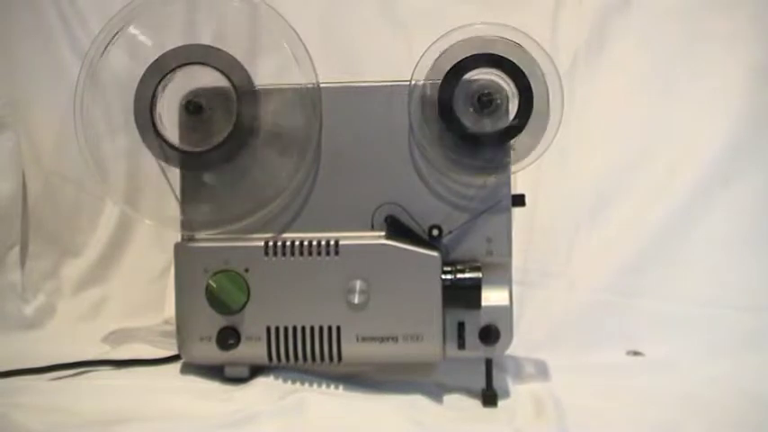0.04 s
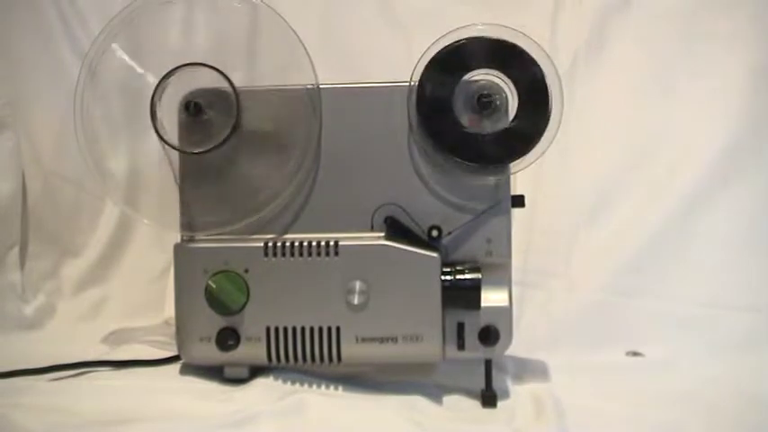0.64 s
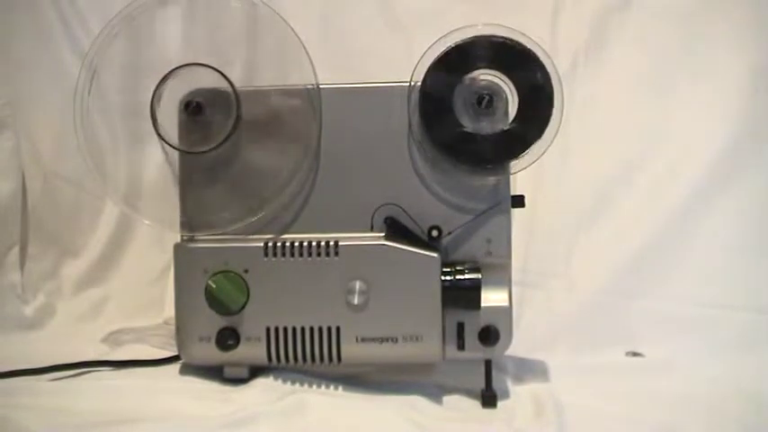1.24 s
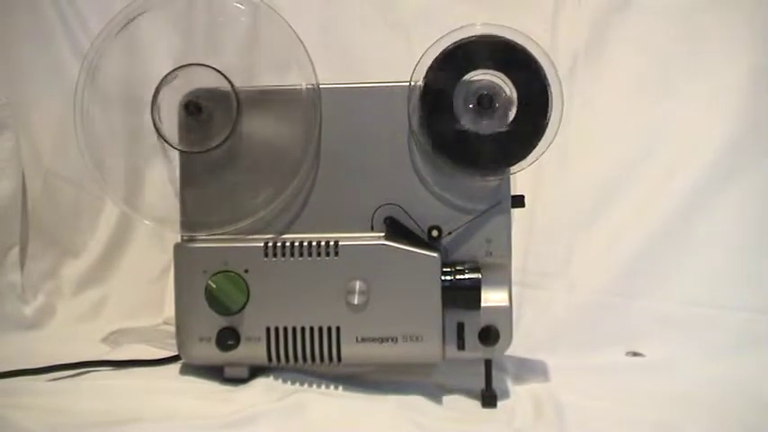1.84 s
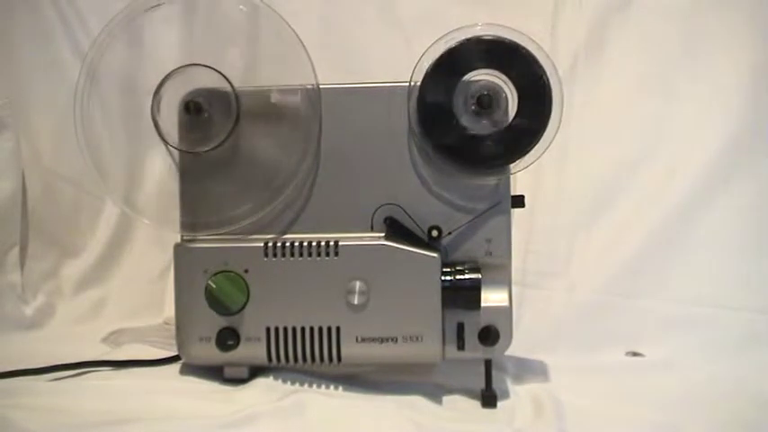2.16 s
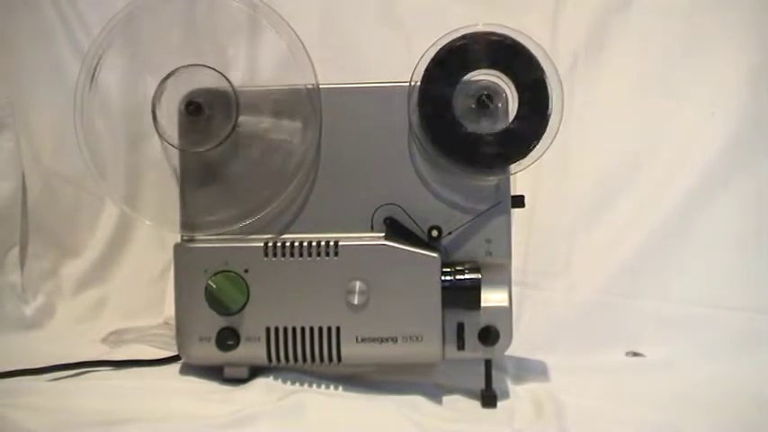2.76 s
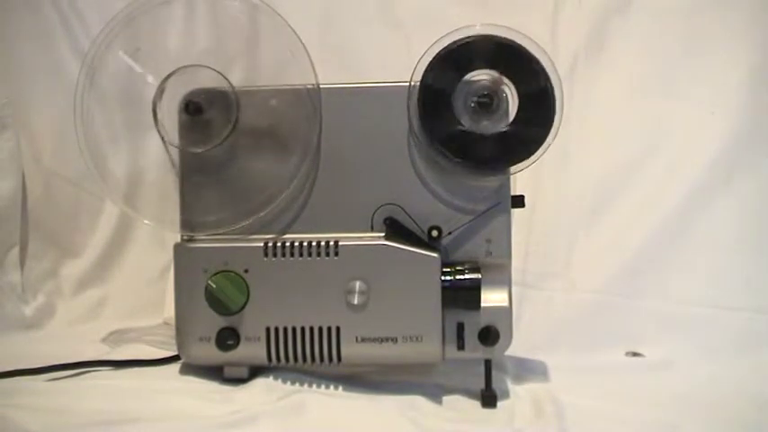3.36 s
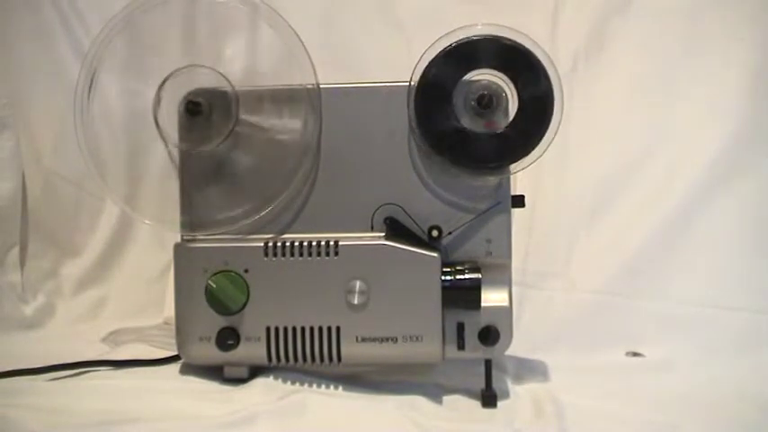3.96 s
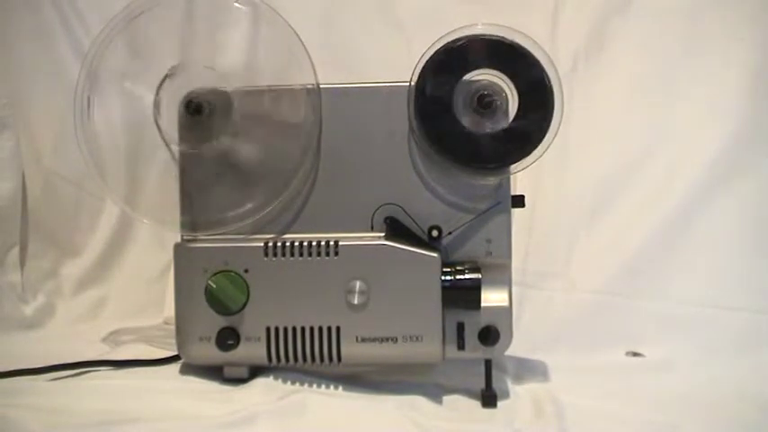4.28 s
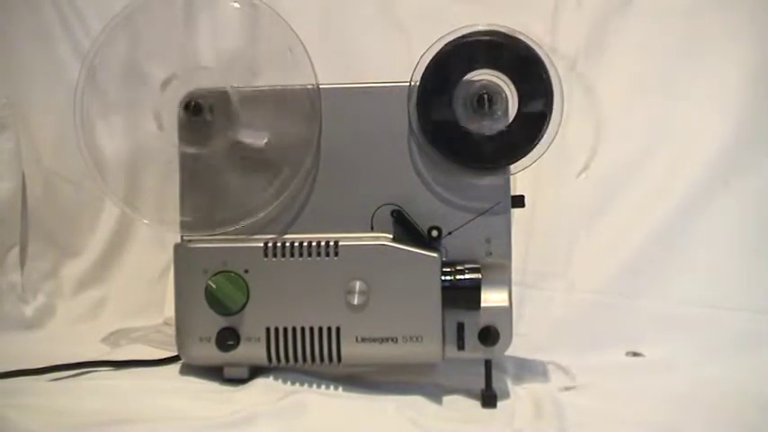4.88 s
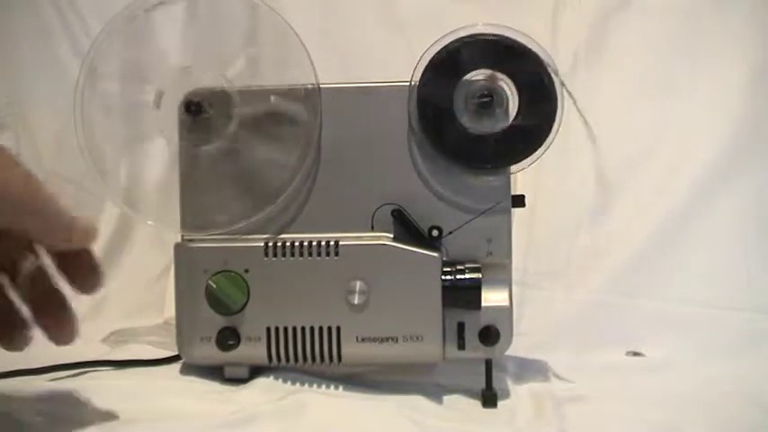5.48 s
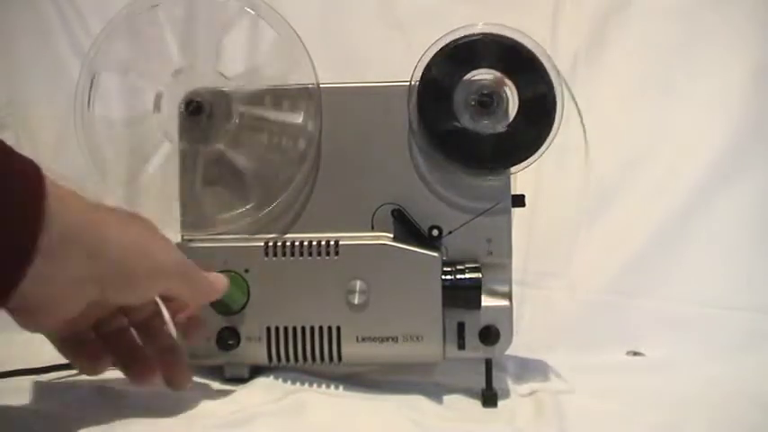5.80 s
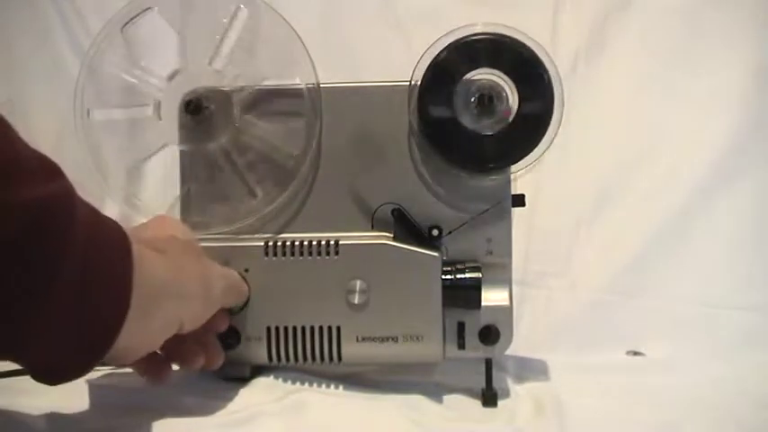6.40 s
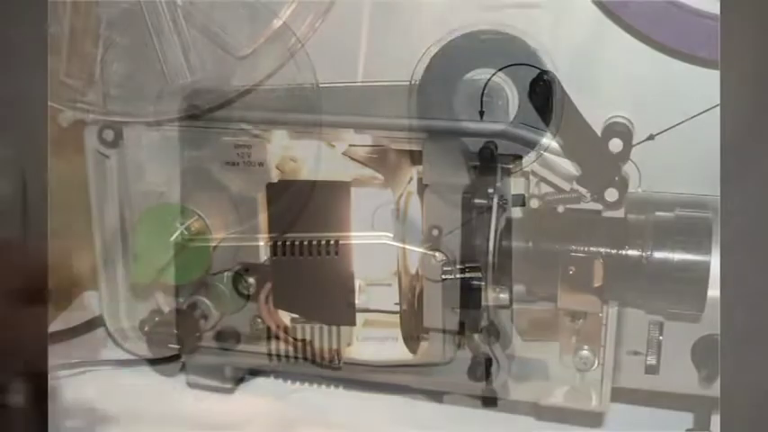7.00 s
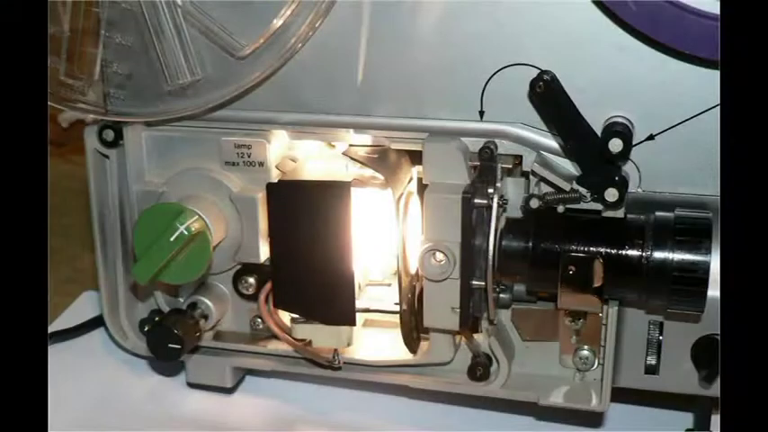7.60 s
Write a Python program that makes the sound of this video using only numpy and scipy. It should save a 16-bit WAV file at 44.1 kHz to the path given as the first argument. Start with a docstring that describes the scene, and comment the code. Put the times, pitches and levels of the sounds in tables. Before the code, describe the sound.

Reels chatter and squeak over a humming projector motor until the film runs out, its tail flicks, and a knob snaps off.

```python
"""A film projector rewinding

A small projector's motor hums and its belts and fan whir. The warped reel rubs and squeaks at the
same places on every turn, the shaking reels chatter and chirp, and the film scrapes the reel's rim.
The film runs out, its loose tail flicks the housing, and a knob switches the motor off with a crack.
Faint ticks sound as the projector runs down, and the last moment fades to silence."""
import sys
import numpy as np
from scipy import signal
from scipy.fft import rfft, irfft
from scipy.io import wavfile

SR = 44100
rng = np.random.default_rng(int(sys.argv[2]) if len(sys.argv) > 2 else 0)


def transcribe(u):
    """Save the signal u as a 16-bit wav file named by the first command-line argument.

    u: samples, shape (n,) or (channels, n), limited to [-1, 1]; the rate is SR.
    q: integer samples, one column per channel.
    """
    v = np.clip(np.atleast_2d(u).T, -1, 1)
    q = np.round(v * 32767).astype(np.int16)
    wavfile.write(sys.argv[1], SR, q)


N = 336924
T = np.arange(N) / SR
HZ = np.fft.rfftfreq(8192, 1 / SR)  # the pitches at which filters are drawn
FILM_OUT_S, MOTOR_OFF_S = 4.6, 6.717


def amp(db):
    """Turns decibels into a number to multiply by."""
    return 10 ** (np.asarray(db) / 20)


def unit(x):
    """Scales a signal to an average strength (rms) of one."""
    return x / np.sqrt(np.mean(x ** 2) + 1e-20)


def curve(rows):
    """Joins rows of (time_s, value) with straight lines."""
    return np.interp(T, *np.transpose(rows))


def at_pitches(rows, hz):
    """Looks up values between rows of (pitch_hz, value), with pitch spaced in octaves."""
    row_hz, value = np.transpose(rows)
    return np.interp(np.log(hz + 1), np.log(row_hz + 1), value)


def add(mix, start_s, sound):
    """Adds a sound into the mix at the given time."""
    part = mix[:, max(round(start_s * SR), 0):][:, :sound.shape[1]]
    part += sound[:, :part.shape[1]]


def wander(hz, size=16384):
    """A random wobble of strength one, no faster than about hz."""
    return unit(np.interp(T * 2 * hz, np.arange(size), rng.standard_normal(size)))


def colour(rows, peaks=()):
    """A tone colour: a broad curve of decibels over pitch, with ringing peaks on top."""
    bumps = sum(db / (1 + (2 * (HZ - hz) / width) ** 2) for hz, width, db in peaks)
    return at_pitches(rows, HZ) + bumps


def filtered(x, shape_db):
    """Turns each pitch up or down, ringing only after a sound and never before it."""
    cepstrum = irfft(np.log(amp(shape_db)))
    forward_only = np.r_[1, np.full(len(HZ) - 2, 2), 1, np.zeros(len(HZ) - 2)]
    response = irfft(np.exp(rfft(cepstrum * forward_only)))
    return signal.oaconvolve(x, response[None], axes=1)[:, :x.shape[1]]


def tint(x, shape_db, band_hz=(0, SR)):
    """Colours a sound, scaled so that plain hiss comes out at its full strength within the band."""
    inside = (HZ >= band_hz[0]) & (HZ < band_hz[1])
    return filtered(x, shape_db) / np.sqrt(np.mean(amp(shape_db) ** 2 * inside))


def echoes(decay_s, size=12000):
    """A cloud of echoes for each side; here and below, a sound drops 60 dB in decay_s."""
    cloud = rng.standard_normal((2, size)) * amp(-60 * np.arange(size) / SR / decay_s)
    return cloud / np.sqrt(np.sum(cloud ** 2, axis=1, keepdims=True))


# How alike left and right are (1 is the same, 0 is unrelated): pitch_hz, likeness
EAR_LIKENESS = [(100, 0.6), (300, 0.94), (600, 0.56), (1200, 0.93), (2500, 0.76), (4500, 0.69),
                (6500, 0.52), (8500, 0.04), (12000, -0.08)]
def stereo(pair):
    """Blends two unrelated signals into left and right: alike in the bass, less so in the treble."""
    same = np.clip(at_pitches(EAR_LIKENESS, HZ), -.99, .99)
    side = filtered(pair[1:], 10 * np.log10((1 - same) / (1 + same)))
    return np.vstack([pair[:1] + side, pair[:1] - side])


def friction(grain_db, grain_hz):
    """Hiss made grainy by countless small catches."""
    return stereo(rng.standard_normal((2, N)) * unit(amp(grain_db * wander(grain_hz))))


# Hum of the mains power: pitch_hz, level_db
HUM_TONES = [(100, -69.5), (200, -64.5), (300, -75)]
# Tones of the spinning shaft at a speed of one: pitch_hz, level_db
SHAFT_TONES = [(47, -82), (167.2, -76), (186, -70.5), (353, -61), (404, -73.5), (652, -72.5), (879, -76.5),
               (2244, -68.5)]
# How loud the motor is: time_s, gain_db
MOTOR_LOUDNESS = [(0, -1.5), (.6, 1.5), (2, 1.5), (3.3, 0), (4.5, -3.5), (5, -5.5), (5.5, -8), (6, -13),
                  (6.8, -14.5)]
# How fast the shaft spins: time_s, speed_ratio
SHAFT_SPEED = [(0, 1.003), (1, 1.005), (3, .999), (4.4, 1.008), (5, 1.015), (6.8, 1.014)]
def motor(waver=.002, throb_db=2.5, unloaded_db=-6.0, die_db_per_s=120):
    """Mains hum, plus shaft tones that soften and rise as the load goes; both die at switch-off."""
    hum = sum(amp(db) * np.sin(2 * np.pi * (hz * T + rng.random())) for hz, db in HUM_TONES)
    shaft_time = np.cumsum(curve(SHAFT_SPEED) * (1 + waver * wander(9.4))) / SR
    shaft = sum(amp(db + throb_db * wander(12)) * np.sin(2 * np.pi * (hz * shaft_time + rng.random()))
                for hz, db in SHAFT_TONES)
    load = amp(unloaded_db * np.clip((T - FILM_OUT_S) / 1.4 + .25, 0, 1))
    level = amp(curve(MOTOR_LOUDNESS) - die_db_per_s * np.maximum(T - MOTOR_OFF_S, 0))
    return np.sqrt(2) * level * (hum + shaft * load)


# How loud the belts, gears and fan are: time_s, level_db
WHIR_LOUDNESS = [(0.0, -55), (0.34, -56), (0.38, -52.5), (0.71, -52), (2.61, -53.5), (3.85, -55.5),
                 (3.93, -56.5), (4.1, -54.5), (4.68, -58), (4.7, -61), (5.0, -61), (6.07, -70.5),
                 (6.69, -71), (6.75, -69.5)]
# Their tone colour: pitch_hz, gain_db
WHIR_COLOUR = [(28, -43), (50, -14), (75, -14), (140, -4.5), (240, -8.5), (400, 0.5), (700, -2.5),
               (950, 1.5), (1550, 0), (1850, -9.5), (3000, -13.5), (6500, -21), (9000, -37.5),
               (15000, -39.5)]
# Pitches that the housing boosts or swallows: pitch_hz, width_hz, gain_db
HOUSING_PEAKS = [(308, 20, 2), (411, 27, 3), (460, 12, 5), (549, 4.7, 6), (872, 23, 3.5), (1123, 5.3, 8.5),
                 (1347, 86, -7), (1643, 18, 5.5), (2213, 32, 10), (2400, 91, 1)]
def whir(gain_db=-0.32, drone_db=12.5, die_db_per_s=53):
    """Belts, gears and fan stir the housing; as they coast to a stop, mostly its low drone remains."""
    rub = tint(friction(grain_db=2.7, grain_hz=400), colour(WHIR_COLOUR, HOUSING_PEAKS), (420, 1600))
    drone = signal.sosfiltfilt(signal.butter(2, [270, 340], "band", fs=SR, output="sos"), rub)
    since_off_s = np.maximum(T - MOTOR_OFF_S, 0)
    coasting = np.minimum(since_off_s / 0.23, 1)
    level = amp(curve(WHIR_LOUDNESS) + gain_db - die_db_per_s * since_off_s)
    return level * (rub + amp(drone_db) * coasting * drone)


def shudder(db, length_s, attack_s=0.001):
    """The power of one short shake: it starts sharply, holds and stops."""
    t = np.arange(SR // 5) / SR
    return (amp(db) * np.minimum(t / attack_s, 1) * np.exp(-(t / length_s) ** 4))[None] ** 2


def bump(middle_s, width_s):
    """A smooth rise to one and back to zero."""
    return np.exp(-((T - middle_s) / width_s) ** 2)


def on_turns(place):
    """The times when the reel passes a place, given as a share of one turn."""
    starts = np.array(REEL_TURNS)[:, 0]
    return starts + place * np.gradient(starts)


# Turns of the slowly quickening reel: start_s, rub_start_db, rub_end_db, lull_db, squeak_db
REEL_TURNS = [(.119, -9.5, -2.5, 0.5, -80), (0.371, 0.5, 2.5, -19.5, -62), (0.618, -1, 4, -7, -51),
              (0.868, 1.5, 2.5, -1, -53.5), (1.126, -1, 3, -7.5, -49.5), (1.384, 1.5, 1.5, -3, -52.5),
              (1.635, -1.5, 2, -14.5, -62), (1.886, 2, 2.5, -16.5, -53.5), (2.134, -1.5, 2, -7, -48),
              (2.383, 0, 3.5, 2, -54), (2.624, 3, -2.5, -5.5, -56), (2.873, 1, -2, -1.5, -52.5),
              (3.108, 1, -2, -5.5, -54), (3.355, -1, -6.5, -4.5, -54), (3.59, -0.5, -2.5, -8.5, -56),
              (3.83, -2, -2.5, -4, -63), (4.065, -3, -0.5, -1, -63), (4.3, -0.5, 2.5, -11, -66),
              (4.538, -6, -16, -5, -79)]
# Light rattle and sliding film, leaving a faint spindle rattle once the film is out: time_s, level_db
LIGHT_RATTLE = [(0, -58.5), (.06, -48), (.4, -50), (4.5, -45), (4.65, -51), (4.69, -64.5), (4.88, -65),
                (5.02, -69), (5.1, -91.5), (6.9, -97), (7.5, -104)]
# Where the warped reel rubs on every turn: share_of_turn, level_db, length_s
REEL_RUBS = [(.007, -37, 0.0098), (0.104, -41, 0.038), (0.25, -40, 0.029), (0.36, -44.5, 0.074),
             (0.434, -43, 0.096), (0.596, -43, 0.043), (0.763, -44.5, 0.058), (0.924, -42.5, 0.019)]
# Hard jolts of the reels on their spindles: start_s, level_db, length_s
REEL_JOLTS = [(0.077, -39, 0.025), (0.371, -34.5, 0.013), (0.414, -39.5, 0.043), (0.504, -36, 0.041),
              (0.624, -33.5, 0.011), (0.681, -37.5, 0.022), (0.772, -33, 0.041), (0.876, -38.5, 0.026),
              (0.939, -33, 0.01), (1.006, -33.5, 0.067), (1.132, -34.5, 0.027), (1.193, -31, 0.011),
              (1.403, -34, 0.014), (1.444, -31, 0.016), (1.532, -39.5, 0.032), (1.618, -34, 0.013),
              (1.656, -31, 0.016), (1.693, -37, 0.035), (1.749, -39.5, 0.026), (1.781, -40, 0.024),
              (1.904, -32.5, 0.017), (1.946, -36.5, 0.02), (2.03, -36.5, 0.03), (2.135, -37, 0.027),
              (2.224, -35.5, 0.0093), (2.266, -43, 0.033), (2.385, -33.5, 0.026), (2.436, -39.5, 0.033),
              (2.505, -35, 0.0062), (2.521, -43.5, 0.068), (2.633, -33.5, 0.0065), (2.681, -36.5, 0.03),
              (2.776, -36, 0.06), (2.881, -35.5, 0.02), (2.931, -37, 0.017), (2.971, -37.5, 0.036),
              (3.019, -35, 0.019), (3.117, -33, 0.029), (3.189, -33, 0.017), (3.229, -36.5, 0.03),
              (3.297, -37, 0.015), (3.358, -37.5, 0.01), (3.406, -38.5, 0.027), (3.504, -38, 0.027),
              (3.671, -39, 0.011), (3.831, -40.5, 0.028), (3.97, -37.5, 0.017), (4.055, -37, 0.017),
              (4.124, -36, 0.018), (4.207, -35, 0.052), (4.359, -35, 0.026), (4.447, -33, 0.016),
              (4.521, -41, 0.021), (4.608, -37.5, 0.037)]
def shaking(spread_db=1.4, jitter_s=0.002, lift_db=-5, lift_s=0.0044, jolt_db=-2, flutter_db=2.0):
    """How hard the reels shake: a light rattle, with rubs, lulls and jolts until the film is out."""
    power = amp(curve(LIGHT_RATTLE))[None] ** 2
    for place, rub_db, length_s in REEL_RUBS:
        chance = np.clip(rng.standard_normal((len(REEL_TURNS), 2)), -2, 2)
        for s, (_, start_db, end_db, _, _), (late, strong) in zip(on_turns(place), REEL_TURNS, chance):
            db = rub_db + start_db + (end_db - start_db) * place + spread_db * strong
            if s < FILM_OUT_S + .04:
                add(power, s + jitter_s * late, shudder(db, length_s))
    # The reel goes quiet as it swings free late in each turn, and as it lifts off before each jolt.
    lulls = sum(db * bump(s, width_s=0.013) for s, (*_, db, _) in zip(on_turns(0.92), REEL_TURNS))
    lifts = sum(lift_db * bump(s - lift_s / 2, lift_s) for s, _, _ in REEL_JOLTS)
    power *= amp(lulls + lifts) ** 2
    for s, db, length_s in REEL_JOLTS:
        add(power, s, shudder(db + jolt_db, length_s))
    return np.sqrt(power[0]) * unit(amp(flutter_db * wander(180)))


# Tone colour of the knocking reels: pitch_hz, gain_db
REEL_COLOUR = [(300, -35.5), (1800, -17), (3200, -9.5), (4150, -10), (4600, 0), (5500, 0), (6700, -3.5),
               (7600, -7.5), (8200, -7.5), (8600, -12.5), (9500, -15), (11400, -13), (13500, -29.5),
               (15500, -27)]
def chatter(force, gain_db=-5.0, knocks_per_s=400, spread_db=2.5, growth=0.82, contacts=6):
    """The reels bounce in countless tiny knocks; each point of contact rings a little differently."""
    strength = force * unit(force) ** (growth - 1)
    knocks = np.zeros((2, N))
    for _ in range(contacts):
        hits = rng.random(N) < knocks_per_s / SR
        sizes = amp(spread_db * np.clip(rng.standard_normal(N), -2, 2))
        kicks = strength * unit(hits * sizes)
        knocks += signal.oaconvolve(kicks[None], echoes(decay_s=0.015, size=1024), axes=1)[:, :N]
    return amp(gain_db) * tint(stereo(knocks / np.sqrt(contacts)), colour(REEL_COLOUR), (4200, 8500))


# Notes at which the plastic reels ring: pitch_hz, width_hz, gain_db
REEL_NOTES = [(4555, 260, -10), (5350, 320, -6.5), (5726, 200.5, -2.5), (5880, 90.2, -0.5), (6460, 140, -6),
              (6820, 250, -3), (7330, 110, -1)]
def chirps(force, gain_db=-2.5, hop_db=6, hop_hz=100, bend=.005, growth=1.095):
    """Hard shaking makes the plastic reels sing; as the contact moves, their notes take turns."""
    shares = np.array([amp(db + hop_db * wander(hop_hz)) for _, _, db in REEL_NOTES])
    shares /= np.linalg.norm(shares, axis=0) ** 0.75  # the notes compete for the same energy
    song = np.zeros((2, N))
    for (hz, width_hz, _), share in zip(REEL_NOTES, shares):
        # Every slip nudges the wave, which smears the note over its width.
        slips = rng.standard_normal((2, N)) * np.sqrt(2 * np.pi * width_hz / SR)
        phase = np.cumsum(2 * np.pi * hz * (1 + bend * wander(60)) / SR + slips, axis=1)
        song += share * np.cos(phase)
    song = signal.sosfilt(signal.butter(3, [4200, 8000], "band", fs=SR, output="sos"), song)
    return amp(gain_db) * force * unit(force) ** (growth - 1) * stereo(unit(song))


# How loud the scraping film is: time_s, level_db
SCRAPE_LOUDNESS = [(0, -59.5), (.3, -55.5), (.45, -51.5), (2.6, -52), (4.3, -54), (4.65, -59.5), (5.2, -77),
                   (6.8, -90), (7.2, -100)]
# Its tone colour: pitch_hz, gain_db
SCRAPE_COLOUR = [(1200, -27), (1750, -20), (2050, -7), (2250, -5), (2420, -3), (2560, -4), (2750, -3.5),
                 (3050, -12), (3500, -7.5), (4500, -9), (7000, -48.5)]
# Hollow ringing of the reel's rim: pitch_hz, width_hz, gain_db
RIM_PEAKS = [(2412, 80, 5.5), (2890, 40, 4)]
def scrape(force, growth=0.15, swell_db=1.7):
    """Film rubs the reel's rim, harder when the reel shakes, and dies away as the film runs out."""
    level = amp(curve(SCRAPE_LOUDNESS) + swell_db * wander(25)) * unit(force) ** growth
    rub = friction(grain_db=2.8, grain_hz=250)
    return level * tint(rub, colour(SCRAPE_COLOUR, RIM_PEAKS), (2150, 2950))


def squeaks(pitch_hz=1712, place=.33, width_s=0.019, waver=0.033, drift=0.027):
    """The reel gives a short, unsteady squeak at the same place on each turn."""
    level = sum(amp(db) * bump(s, width_s) for s, (*_, db) in zip(on_turns(place), REEL_TURNS))
    bend = 1 + waver * wander(120) + drift * wander(6.7)
    return np.sqrt(2) * level * np.sin(2 * np.pi * pitch_hz * np.cumsum(bend) / SR)


def strike(db, decay_s, snap_db=0):
    """A sharp hit: one snap, then a dying hiss that stands for many close notes."""
    t = np.arange(SR // 4) / SR
    hit = rng.standard_normal((2, len(t)))
    hit[0, 0] = amp(snap_db)
    return hit * amp(db - 60 * t / decay_s)


# Slaps of the film's tail, then faint ticks as the projector runs down:
# start_s, level_db, decay_s, brightness_db_per_octave, pitch_hz
SLAPS_AND_TICKS = [(5.030, -42.5, 0.013, 4.5, 2400), (5.2758, -44, 0.068, 4, 7240),
                   (5.5895, -46.5, 0.075, -2, 5000), (5.807, -65.5, 0.069, -6, 5300),
                   (5.924, -54.5, 0.044, 4, 4600), (5.9306, -55, 0.071, -9, 4830),
                   (5.9405, -58, .02, 0, 4830), (5.983, -60.5, 0.028, 3, 5240), (6.261, -66, 0.12, 4, 5660),
                   (6.425, -62.5, 0.018, 2, 5370), (6.598, -64, 0.1, -3, 7340),
                   (6.702, -73, 0.035, -3, 5860), (6.946, -73, 0.25, 1, 5460),
                   (7.076, -72.5, 0.014, -5, 5030), (7.29, -81, 0.1, -7, 5200)]
# Their tone colour: pitch_hz, gain_db
TAP_COLOUR = [(500, -48), (2000, -13.5), (3800, -5), (4600, 0.5), (6000, -4), (7400, -5), (8600, -13),
              (11500, -16.5), (13500, -32), (15500, -27)]
# Ringing that they all share: pitch_hz, width_hz, gain_db
TAP_PEAKS = [(4580, 130, 7.5), (4970, 81, 5.5), (5950, 120, 10.5), (6500, 90, 7), (7300, 100, 4)]
def slaps_and_ticks(brush_lead_s=0.0073, brush_db=-19, peak_width_hz=320, peak_db=8.5, stutter_db=1.0):
    """The film's tail brushes and slaps the housing, then faint ticks follow; each has its own pitch."""
    out = np.zeros((2, N))
    for s, db, decay_s, brightness, pitch_hz in SLAPS_AND_TICKS:
        peaks = TAP_PEAKS + [(pitch_hz, peak_width_hz, peak_db)]
        shape = colour(TAP_COLOUR, peaks) + brightness * np.log2(1 + (HZ / 2000) ** 2) / 2
        add(out, s - brush_lead_s, tint(strike(db + brush_db, decay_s), shape))
        add(out, s, tint(strike(db, decay_s, snap_db=8), shape))
    return stereo(out * unit(amp(stutter_db * wander(250))))


# The knob is gripped, turned and snaps over: start_s, ring_db, crack_db, centre_hz
KNOB_KNOCKS = [(6.03, -60.5, -74, 2390), (6.166, -67, -82, 2340), (6.802, -56, -67, 800),
               (6.8115, -46.5, -74, 810), (6.8167, -51.5, -49, 2650), (7.12, -80, -85, 1204),
               (7.375, -81.5, -98, 890)]
# Tone colour of its crack: pitch_hz, gain_db
CRACK_COLOUR = [(60, -37), (500, -14), (1000, -1), (1600, -5), (3200, 1), (4500, 2.5), (6500, -3),
                (8000, -16), (11000, -26), (15000, -36)]
# Notes of the knob and the panel behind it: pitch_hz, gain_db, decay_s
KNOB_NOTES = [(805, -8, .035), (933, 0.5, 0.035), (1045, -1, 0.033), (1500, 0, 0.077), (1590, -1, .08),
              (2090, -6, .05), (2580, -3.5, 0.04), (2920, -13, .04), (3250, -5, 0.055), (3530, -8, 0.075),
              (3900, -9, .08), (5180, -4, .07), (6340, 4, .06)]
def knob(swell_s=0.0016, focus_db=12.5):
    """Fingers tap the knob, it knocks dully as it turns, and the switch snaps over with a crack."""
    out, t = np.zeros((2, N)), np.arange(SR // 4) / SR
    swell = np.minimum(t / swell_s, 1)  # the panel takes a moment to start ringing
    for s, ring_db, crack_db, centre_hz in KNOB_KNOCKS:
        add(out, s, tint(strike(crack_db, decay_s=0.027, snap_db=14), colour(CRACK_COLOUR)))
        for hz, db, decay_s in KNOB_NOTES:
            # A note one octave from the knock's centre rings focus_db less.
            level_db = ring_db + db - focus_db * np.log2(hz / centre_hz) ** 2
            tone = np.sin(2 * np.pi * (hz * t + np.array([[0], [rng.random()]])))
            add(out, s, swell * amp(level_db - 60 * t / decay_s) * tone)
    return stereo(out)


def room(x, echo_db, decay_s):
    """Adds the short echo of a small, curtained room."""
    tail = np.pad(echoes(decay_s), ((0, 0), (SR // 250, 0)))  # arrives 4 ms late
    return x + amp(echo_db) * signal.oaconvolve(x, tail, axes=1)[:, :N]


def scene():
    """The whole projector, heard from close by; one shaking force drives the reel sounds."""
    force = shaking()
    reels = room(chatter(force) + chirps(force), echo_db=-16.5, decay_s=0.042)
    taps = room(slaps_and_ticks(), echo_db=-8.5, decay_s=0.18)
    clicks = room(knob(), echo_db=-5.5, decay_s=0.2)
    return reels + taps + clicks + scrape(force) + whir() + motor() + squeaks()


# How the two microphones differ in tone colour: pitch_hz, left_minus_right_db
MIC_BALANCE = [(30, -6.5), (70, -11), (170, -10), (350, -5), (700, -1.5), (1500, 0.5), (2500, -1.5),
               (6000, -2.5), (7400, -3.5), (8300, 1.5), (9800, -4.5), (11200, -0.5), (13000, 1)]
def record(dry, fade_s=0.27, top_hz=15780):
    """Leans each pitch left or right, fades out the end and removes the highest treble."""
    balance_db = at_pitches(MIC_BALANCE, np.fft.rfftfreq(N, 1 / SR))
    sides = amp(balance_db * np.array([[.5], [-.5]]))
    heard = irfft(rfft(dry) * sides / sides.mean(0), N)
    fade = np.clip((T[-1] - T) / fade_s, 0, 1) ** 2
    treble_cut = signal.firwin(511, top_hz, window=("kaiser", 9), fs=SR)
    return signal.oaconvolve(heard * fade, treble_cut[None], "same")


dry = scene()
out = record(dry)
transcribe(out)
```